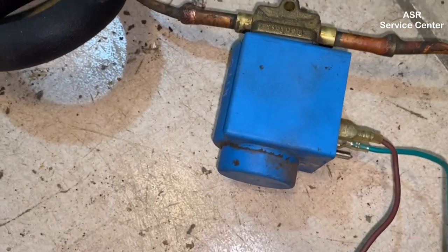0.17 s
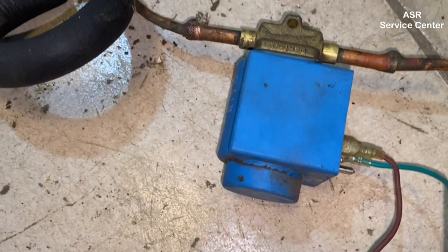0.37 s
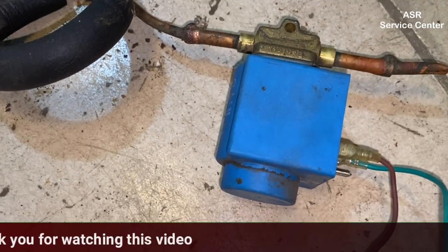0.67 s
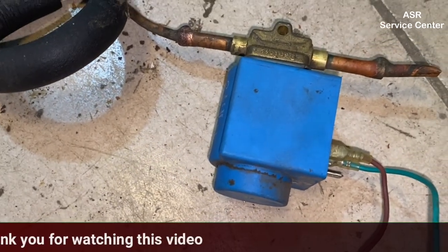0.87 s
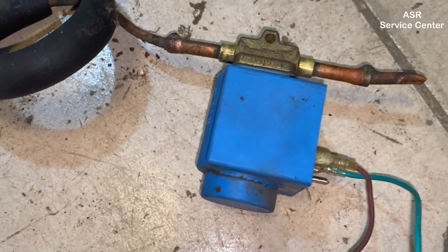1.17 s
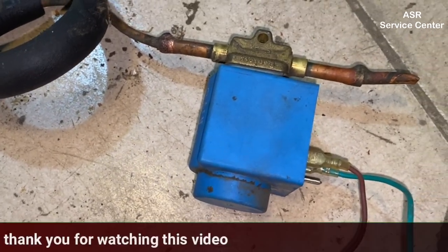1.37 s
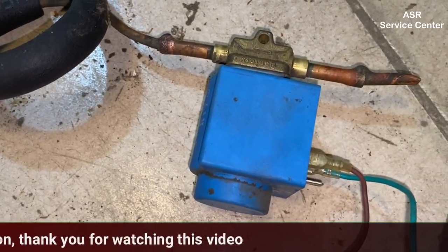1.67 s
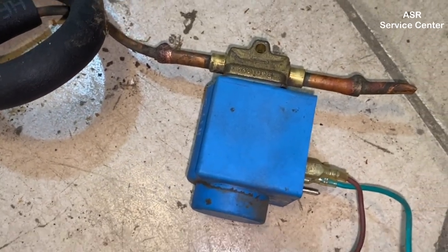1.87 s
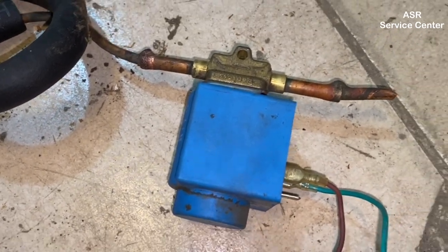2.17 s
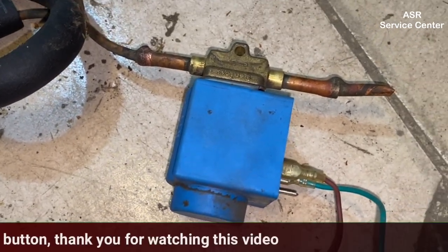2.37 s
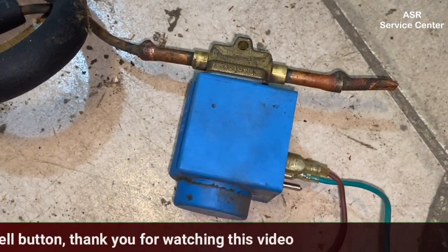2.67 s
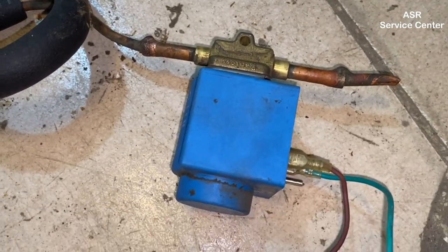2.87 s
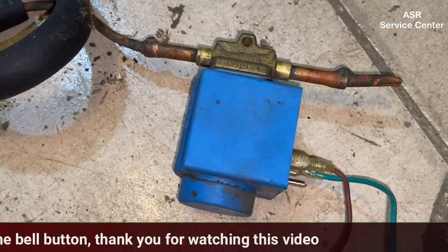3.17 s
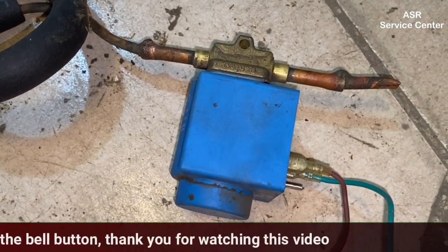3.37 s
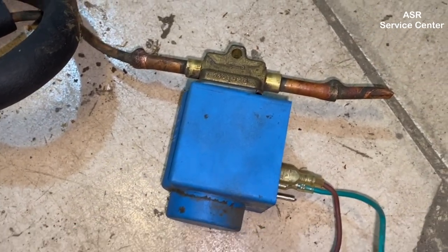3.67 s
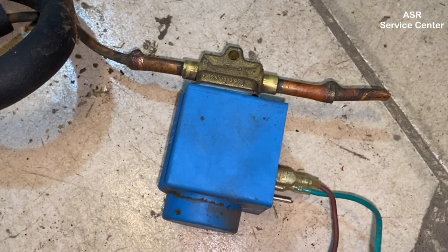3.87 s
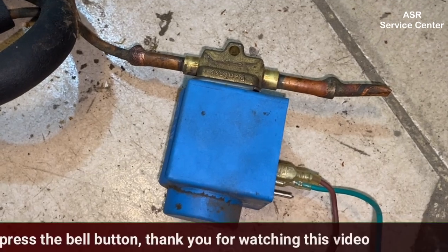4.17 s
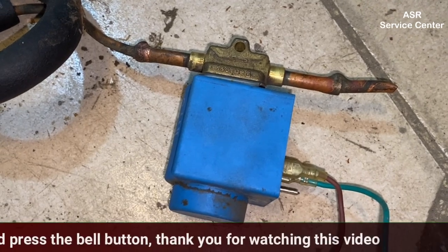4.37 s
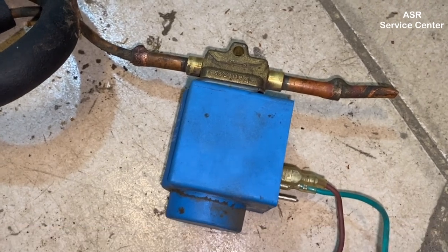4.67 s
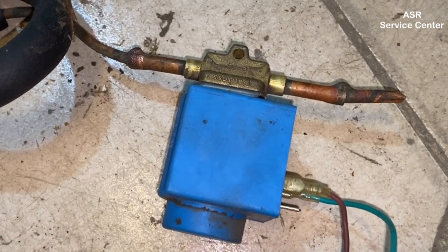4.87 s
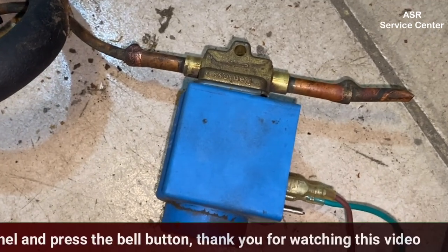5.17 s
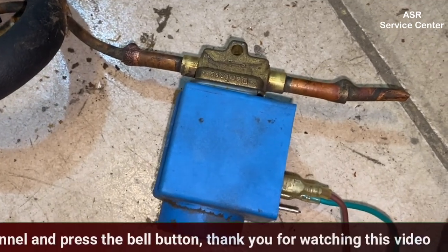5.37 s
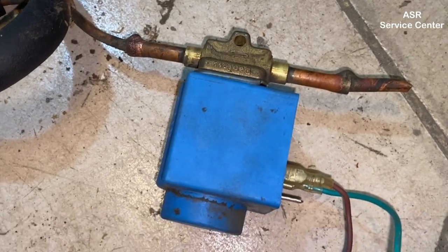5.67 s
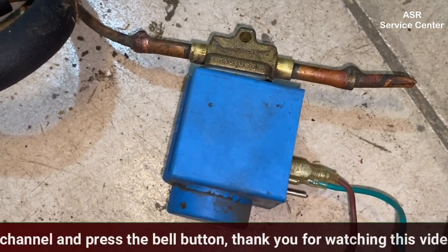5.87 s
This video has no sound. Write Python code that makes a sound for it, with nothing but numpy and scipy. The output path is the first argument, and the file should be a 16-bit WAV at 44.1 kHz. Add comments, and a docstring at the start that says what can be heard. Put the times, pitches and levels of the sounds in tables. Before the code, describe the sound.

Four loud, sharp metallic clacks alternate with softer, rattlier clicks as a solenoid valve switches on and off over a low motor hum.

```python
"""A motor hums and drones over steady air noise; then come faint ticks and four pairs of metallic clacks.
A solenoid valve on a workshop floor is switched on and off four times, close to a phone.
Each pull slams the plunger home: it chatters, rings the brass body and copper pipe, and thuds in the floor.
Each release lets a spring throw it back more softly, with a scrape, a rattle and a few fading pings.
Tones make the hum and the body's ring, shaped noise the rest; the phone ducks after loud clicks."""
import sys
import numpy as np
from scipy import signal
from scipy.fft import rfft, irfft
from scipy.io import wavfile
from scipy.ndimage import uniform_filter1d

SR = 44100
rng = np.random.default_rng(int(sys.argv[2]) if len(sys.argv) > 2 else 0)


def materialize(psi):
    """Save the field psi as 16-bit PCM at rate SR to the path in sys.argv[1].

    A 1-D psi becomes a single channel; in a 2-D psi each row is a channel.
    """
    bounded = np.clip(np.atleast_2d(psi).T, -1, 1)
    quanta = np.round(bounded * 32767).astype(np.int16)
    wavfile.write(sys.argv[1], SR, quanta)


N = 265041

# Steady noise of the workshop air: pitch_hz, relative_level_per_hz_db, side_minus_mid_db
AIR = [(25.1, -25, -17), (60, 0, -14), (101.6, -1.5, -15.5), (172, -5, -15), (244, -1.5, -11),
       (364.6, -3.5, -9), (466, -10.5, 0.5), (700, -7.5, 1.5), (1000, -9, -1.5), (1375, -12, 3.5),
       (2300, -20, -3.5), (3086, -23, -3.5), (3945, -27.5, -3), (6600, -35.5, -3.5), (9100, -44, 9),
       (11570, -44, -7), (16100, -73, 5.5)]
# Resonances in the motor's drone: pitch_hz, width_hz, rms_level_db, left_minus_right_db
DRONE = [(145.6, 5.4, -56.5, -4.5), (251.5, 12, -54, -3), (558.3, 14, -57, 1.5), (637, 60, -49.5, 4),
         (865, 16, -62, 0.5), (1078, 22, -61, 2.5), (1830, 160, -63, 5), (2400, 110, -66, 7)]
# The motor's tones: multiple_of_shaft_rate, rms_level_db, level_waver_db, phase_wander_radians,
# left_minus_right_db, left_lead_radians
HUM = [(1, -45, 1.25, 0.13, -1.5, 0.018), (13, -48.5, 2, 0.85, 5, 1.704)]
# Stray ticks; the second to fifth come as the plunger drags just before its first pull: start_s, level_db,
# pitch_hz, width_hz, t60_s (t60 is the time to fade by 60 dB)
TICKS = [(.288, -46, 3100, 1900, 0.12), (0.3253, -39, 2900, 350, 0.047), (0.3272, -34, 1200, 350, 0.045),
         (.3262, -36.5, 3000, 3020, .07), (0.332, -37.5, 6370, 1500, 0.14),
         (1.384, -48.5, 6000, 5530, 0.038), (1.680, -56.5, 8150, 7000, .04)]
# Coil on, plunger slams home: start_s, level_db, first_rebound_ms, rebound_db, knock_db, top_treble_db,
# favoured_pitch_hz, favoured_boost_db, ping_db, long_ring_db
PULLS = [(0.3407, -2, 2.2, 0, 3, -0.5, 3050, 2.5, 1, 2.5),
         (2.1495, -2, 2.7, 0, 3.5, 0.5, 1460, 3.5, 0.5, 3.5),
         (3.4495, -1, 1.6, 0.5, 3, -1, 7000, 6.5, 0.5, 2.5),
         (5.049, -1.5, 3, 0, 5.5, 4, 2740, 4, -4.5, 3.5)]
# Coil off, plunger falls back: start_s, level_db, unstick_level_db, scrape_level_db, favoured_pitch_hz,
# favoured_boost_db, favoured_width_octaves, knock_db, rattle_time_s
RELEASES = [(1.0521, -1, -46, -33, 3150, 13, 0.28, 0.5, .045),
            (2.6389, 0.5, -28, -36, 3160, 3.5, 0.13, -0.5, .045),
            (4.0885, 1, -44, -25, 7600, 3, 0.15, 0.5, .045),
            (5.6002, -0.5, -24, -29, 4120, 6.5, .2, -0.5, .03)]
# The crack of steel on steel: pitch_hz, pull_level_db, release_level_db
CRACK = [(100, -5.5, -6), (395, -1, -1.5), (1020, -1.5, 2), (2940, 5.5, 1), (5350, 2.5, -3.5),
         (7000, 9.5, -0.5), (8260, -2.5, 7.5), (9880, 4, -1.5), (11600, 1, 6), (11470, 7, -17.5),
         (12770, 0, -4), (15650, -9.5, -10.5)]
# Ringing modes of the valve body: pitch_hz, t60_s, pull_level_db, release_level_db
BODY = [(306, 0.13, -43.5, -60), (457, .03, -41, -54.5), (677, .025, -38, -54), (825, .03, -33.5, -47),
        (1055, 0.023, -33, -38), (1520, 0.03, -28, -36), (1767, 0.028, -31, -26), (2025, .03, -43, -33),
        (2240, 0.034, -29, -38), (2530, 0.034, -45.5, -31), (2707, .035, -35.5, -58),
        (2876, 0.03, -36, -72), (3166, .025, -35, -38), (3530, .035, -34.5, -44), (4260, 0.03, -34, -32),
        (4760, 0.022, -40, -50), (5950, .02, -28, -55), (6587, 0.039, -19.5, -46), (7420, .026, -23.5, -35),
        (7860, .026, -8.5, -32), (8200, .018, -24, -36), (8440, .022, -25, -27), (8630, .028, -33, -25),
        (8900, .025, -26, -31), (9760, .024, -27, -33), (12030, .026, -26.5, -48), (12630, .02, -28.5, -39),
        (13290, 0.02, -29.5, -42), (13200, .02, -35.5, -39), (14730, .02, -35, -50)]
# Clusters of close modes in the copper pipe: pitch_hz, width_hz, t60_s, pull_level_db, release_level_db
PIPE = [(1900, 900, .3, -47, -70), (4330, 120, .45, -54, -76), (4700, 1600, .38, -44.5, -60),
        (6050, 900, .56, -43, -63), (6500, 60, .45, -47, -72), (7260, 130, .55, -46, -72),
        (7865, 85, .42, -42, -68), (8350, 700, .36, -45, -55), (8000, 3000, .48, -44, -62),
        (12300, 1600, .3, -51, -58)]
# The plunger rattling on its return spring: pitch_hz, t60_s, level_db
SPRING = [(1780, 0.01, -36), (1990, 0.012, -31.5), (2470, 0.0064, -42), (8400, .012, -49)]
# Taps of the plunger on its spring after a release: delay_s, level_db
BOBS = [(.0108, -0.5), (.0198, -6.5), (.0245, -1.5), (.034, -16), (.0378, 0.5)]
# The two microphone ports: pitch_hz, left_minus_right_db, left_lead_radians
PORTS = [(300, -1, 0), (750, 4, .9), (1000, 4, 1.8), (1350, 1.5, 1.8), (2000, 4.5, .9), (3000, 5.5, .7),
         (4300, 6, .7), (5400, 6, -.2), (6500, 2, .1), (7800, .5, -1.5), (8900, 0, -3.1), (13200, 0, -9.3),
         (15500, 0, -12.8)]

TIME = np.arange(N) / SR
FREQ = np.maximum(np.arange(N // 2 + 1) * SR / N, 1)
AGE = TIME[:SR * 2 // 3]  # seconds since a blow

SHAFT_HZ, AIR_DB = 48.02, -41
ROOM_RIPPLE_DB, ROOM_RIPPLE_HZ = 2, 44.1  # depth and spacing of the room's standing waves
# A faint short burst of noise leads each slam by about two milliseconds
LEAD_IN_S, LEAD_IN_DB, LEAD_IN_HZ, LEAD_IN_WIDTH_HZ, LEAD_IN_T60_S = 0.0023, -37, 4200, 3400, 0.0193
# Every pull knocks on the coil housing; the knock and the treble differ in strength from pull to pull
KNOCK_HZ, KNOCK_OCTAVES, TREBLE_HZ, TREBLE_OCTAVES = 1800, 0.79, 12240, 0.48
PING_HZ, PING_OCTAVES = 7860, .04  # the valve's loudest mode, struck harder or softer at each pull
PULL_CRACK_DB, PULL_CRACK_T60_S, PULL_BODY_DB = -10, 0.016, 2
PIPE_FLICKER_DB, PIPE_FLICKER_HZ = 1.5, 70  # depth and speed of the beating among the pipe's modes
# Every pull thuds into the floor, whose bending waves bring the lows late; the lag holds at the centre pitch
THUD_DB, THUD_HZ, THUD_WIDTH_HZ, THUD_LAG_S = -21, 310, 430, .009
# The loose coil housing rattles after every pull
RATTLE_DB, RATTLE_HZ, RATTLE_WIDTH_HZ = -28, 2505, 2800
RATTLE_GAP_S, RATTLE_T60_S, RATTLE_TAP_T60_S = 0.005, 0.11, 0.0093
# Every release: the plunger unsticks, scrapes along its tube, lands, rebounds and touches its seat again
UNSTICK_LEAD_S, UNSTICK_HZ, UNSTICK_T60_S, UNSTICK_GRIT_DB = 0.0057, 3280, 0.015, -16
SCRAPE_LEAD_S, SCRAPE_HZ, SCRAPE_WIDTH_HZ, SCRAPE_T60_S = 0.0043, 7100, 4500, 0.011
DROP_GAP_MS, DROP_REBOUND_DB = 2.2, -8.5
DROP_CRACK_DB, DROP_CRACK_T60_S, DROP_BODY_DB = -12, 0.0059, -3
DROP_RING_SHARE = 0.79  # the soft seat damps the body: its ring time as a share of that after a pull
SEAT_DELAY_S, SEAT_DB, SEAT_HZ, SEAT_WIDTH_HZ, SEAT_T60_S = .0072, -36, 8000, 2400, 0.021
SURGE_ROUND_TRIP_S = .0125  # time that the wave takes to run up the spring and back
SURGE_HZ, SURGE_WIDTH_HZ, SURGE_T60_S, SURGE_DB, SURGE_LOSS_DB = 6530, 1000, 0.012, -37, -4.5
TOP_HZ = 15600  # the phone passes nothing much above this


def undb(db):
    """Turn decibels into gain."""
    return 10 ** (np.asarray(db) / 20)


def unit(x):
    """Scale to an average (rms) level of 1."""
    return x / np.sqrt(np.mean(x ** 2))


def curve(hz, values):
    """Join points by straight lines on a log-frequency axis."""
    return np.interp(np.log(FREQ), np.log(hz), values)


def noise(gain):
    """Noise of rms 1 with the given gain at each frequency."""
    return unit(irfft(rfft(rng.standard_normal(N)) * gain, N))


def band(hz, width):
    """Gain of a resonance with steep skirts: strongest at one pitch, weaker on both sides."""
    return 1 / (1 + ((FREQ / hz - hz / FREQ) * hz / (1.5 * width)) ** 2)


def wander(hz):
    """Slow random drift of rms 1."""
    return noise(np.exp(-(FREQ / hz) ** 2))


def standing_waves():
    """Gain at each frequency: the room favours some pitches and swallows others."""
    hz = np.arange(0, SR / 2, ROOM_RIPPLE_HZ)
    depth_db = ROOM_RIPPLE_DB * np.minimum(FREQ / 1000, 1)  # full depth from 1 kHz up
    return undb(depth_db * np.interp(FREQ, hz, rng.standard_normal(len(hz))))


def workshop(waver_hz=5, drone_side_db=-9):
    """A motor hums on multiples of its shaft rate and drones in a few resonances over steady air noise."""
    hz, air_db, side_db = np.transpose(AIR)
    side = undb(curve(hz, side_db))
    colour = undb(curve(hz, air_db)) * standing_waves() / np.hypot(1, side)
    mid_noise, side_noise = rfft(rng.standard_normal((2, N)))
    opposed = np.array([[1], [-1]])  # left, right
    air = irfft(colour * (mid_noise + opposed * side * side_noise), N)
    out = undb(AIR_DB) * unit(air)
    for centre, width, db, pan_db in DRONE:
        shape = band(centre, width)
        spread = undb(drone_side_db) * np.interp(centre, FREQ, side)
        drone = noise(shape) + opposed * spread * noise(shape)
        out += undb(db + opposed * pan_db / 2) * unit(drone)
    for multiple, db, waver_db, drift, pan_db, lead in HUM:
        steady_phase = 2 * np.pi * round(multiple) * SHAFT_HZ * TIME
        tone = np.sin(steady_phase + drift * wander(waver_hz) + opposed * lead / 2)
        wavering = tone * undb(waver_db * wander(waver_hz))
        out += undb(db + opposed * pan_db / 2) * unit(wavering)
    return out


def burst(gain):
    """A stretch of coloured noise, rms 1, long enough for one blow."""
    size = len(AGE)
    colour = np.interp(np.arange(size // 2 + 1) * SR / size, FREQ, gain)
    return unit(irfft(rfft(rng.standard_normal(size)) * colour, size))


def fade(t60, delay=0, rise=0.0001):
    """Loudness shape of one blow: a quick rise, then an exponential decay."""
    age = np.maximum(AGE - delay, 0)
    return np.minimum(age / rise, 1) * np.exp(-np.log(1000) * age / t60)


def add(track, s, sound):
    """Mix a sound into the track from time s."""
    start = int(s * SR)
    track[start:start + len(sound)] += sound[:N - start]


def tick(db, hz, width, t60):
    """A faint tick: a short burst of noise in one resonance."""
    return undb(db) * burst(band(hz, width) ** 2) * fade(t60, rise=0.00048)


def stray_ticks():
    """Faint touches of metal: a stray tick, the plunger dragging just before its first pull, and two more ticks
    later."""
    track = np.zeros(N)
    for s, db, hz, width, t60 in TICKS:
        add(track, s, tick(db, hz, width, t60))
    return track


def favour(hz, db, octaves=0.088):
    """The plunger never seats quite alike: each landing lifts or cuts some part of the spectrum."""
    return undb(db * np.exp(-(np.log2(FREQ / hz) / octaves) ** 2))


def ring(hz, detune=0.002):
    """One ringing mode as a sine, a little differently tuned at each blow."""
    tuned_hz = hz * (1 + detune * rng.standard_normal())
    return np.sin(2 * np.pi * (tuned_hz * AGE + rng.random()))


def chatter(t60, gap_ms, rebound_db, shrink=.65, loss_db=-2.5):
    """The plunger lands and rebounds three times, each rebound weaker; the energies of the blows add."""
    gap = gap_ms / 1000
    blows = [(0, 0.0049)]  # delay in s, level in dB
    blows += [(gap * (1 + k * shrink), rebound_db + k * loss_db) for k in range(3)]
    return np.sqrt(sum((undb(db) * fade(t60, delay, rise=0.00035)) ** 2 for delay, db in blows))


def stroke(body_db, crack_shape_db, pipe_db, crack_db, crack_t60, gap_ms, rebound_db, landing, ring_share=1):
    """One stroke cracks, rings the valve body briefly and leaves the pipe shimmering."""
    crack_colour = undb(curve([row[0] for row in CRACK], crack_shape_db))
    click = undb(crack_db) * burst(crack_colour * landing) * chatter(crack_t60, gap_ms, rebound_db)
    for (hz, t60, *_), db in zip(BODY, body_db):
        strength = undb(db) * np.interp(hz, FREQ, landing)
        click += strength * ring(hz) * chatter(t60 * ring_share, gap_ms, rebound_db)
    beating = undb(PIPE_FLICKER_DB * burst(np.exp(-(FREQ / PIPE_FLICKER_HZ) ** 2)))
    for (hz, width, t60, *_), db in zip(PIPE, pipe_db):
        strength = undb(db) * np.interp(hz, FREQ, landing)
        click += strength * burst(band(hz, width) * landing) * fade(t60) * beating
    return click


def thud():
    """One smooth, broad push on the floor, spread out so that the lows arrive last."""
    phase = 4 * np.pi * THUD_LAG_S * np.sqrt(THUD_HZ * FREQ)
    wave = irfft(band(THUD_HZ, THUD_WIDTH_HZ) * np.exp(-1j * phase), N)[:len(AGE)]
    return undb(THUD_DB) * wave / np.abs(wave).max()


def housing_rattle(count=10):
    """The loose housing makes a quick, uneven run of small taps that dies away."""
    delays = RATTLE_GAP_S * np.cumsum(.5 + rng.random(count))
    sizes = undb(2 * rng.standard_normal(count)) * np.exp(-np.log(1000) * delays / RATTLE_T60_S)
    energy = sum((size * fade(RATTLE_TAP_T60_S, delay)) ** 2 for delay, size in zip(delays, sizes))
    return undb(RATTLE_DB) * burst(band(RATTLE_HZ, RATTLE_WIDTH_HZ)) * np.sqrt(energy)


def pull_in():
    """The coil draws the plunger up its tube and slams it home; the floor thuds and the housing rattles."""
    track = np.zeros(N)
    body_db, pipe_db, crack_shape_db = np.transpose(BODY)[2], np.transpose(PIPE)[3], np.transpose(CRACK)[1]
    for s, db, gap_ms, rebound_db, knock_db, treble_db, spot_hz, spot_db, ping_db, ring_db in PULLS:
        landing = favour(KNOCK_HZ, knock_db, KNOCK_OCTAVES) * favour(TREBLE_HZ, treble_db, TREBLE_OCTAVES)
        landing = landing * favour(spot_hz, spot_db) * favour(PING_HZ, ping_db, PING_OCTAVES)
        add(track, s - LEAD_IN_S, tick(LEAD_IN_DB, LEAD_IN_HZ, LEAD_IN_WIDTH_HZ, LEAD_IN_T60_S))
        slam = stroke(body_db + PULL_BODY_DB, crack_shape_db, pipe_db + ring_db,
                      PULL_CRACK_DB, PULL_CRACK_T60_S, gap_ms, rebound_db, landing)
        add(track, s, undb(db) * (slam + thud() + housing_rattle()))
    return track


def drop_out():
    """The plunger unsticks, scrapes back along its tube, lands softly and touches its seat once more."""
    track = np.zeros(N)
    body_db, pipe_db, crack_shape_db = np.transpose(BODY)[3], np.transpose(PIPE)[4], np.transpose(CRACK)[2]
    for s, db, unstick_db, scrape_db, spot_hz, spot_db, spot_octaves, knock_db, _ in RELEASES:
        landing = favour(KNOCK_HZ, knock_db, KNOCK_OCTAVES) * favour(spot_hz, spot_db, spot_octaves)
        grit = undb(UNSTICK_GRIT_DB) * burst(band(SCRAPE_HZ, SCRAPE_WIDTH_HZ))
        unstick = (ring(UNSTICK_HZ, detune=0.032) + grit) * fade(UNSTICK_T60_S, rise=0.000488)
        add(track, s - UNSTICK_LEAD_S, undb(unstick_db) * unstick)
        add(track, s - SCRAPE_LEAD_S, tick(scrape_db, SCRAPE_HZ, SCRAPE_WIDTH_HZ, SCRAPE_T60_S))
        soft_blow = stroke(body_db + DROP_BODY_DB, crack_shape_db, pipe_db, DROP_CRACK_DB, DROP_CRACK_T60_S,
                           DROP_GAP_MS, DROP_REBOUND_DB, landing, DROP_RING_SHARE)
        add(track, s, undb(db) * soft_blow)
        add(track, s + SEAT_DELAY_S, tick(db + SEAT_DB, SEAT_HZ, SEAT_WIDTH_HZ, SEAT_T60_S))
    return track


def spring_rattle(scatter_db=1.5):
    """After each release the plunger bobs on its spring and taps a few more times, until it comes to rest."""
    track = np.zeros(N)
    for s, *_, rattle_s in RELEASES:
        for delay, bob_db in BOBS:
            if delay >= rattle_s:
                continue
            tap = np.zeros(len(AGE))
            for hz, t60, db in SPRING:
                strength = undb(db + scatter_db * rng.standard_normal())
                tap += strength * ring(hz, detune=0.028) * fade(t60, rise=0.00076)
            add(track, s + delay, undb(bob_db) * tap)
    return track


def spring_surge(count=4, scatter_db=2.5):
    """A wave runs up and down the spring after each release: evenly spaced pings that tend to fade."""
    track = np.zeros(N)
    for s, *_ in RELEASES:
        for k in range(count):
            db = SURGE_DB + k * SURGE_LOSS_DB + scatter_db * rng.standard_normal()
            ping = tick(db, SURGE_HZ, SURGE_WIDTH_HZ, SURGE_T60_S)
            add(track, s + (k + 1) * SURGE_ROUND_TRIP_S, ping)
    return track


def valve():
    """A few stray ticks, hard strokes in, and soft strokes out with their rattle and pings."""
    return stray_ticks() + pull_in() + drop_out() + spring_rattle() + spring_surge()


def ports(x):
    """The near valve reaches the two microphone ports with different level and delay."""
    hz, pan_db, lead = np.transpose(PORTS)
    half = undb(curve(hz, pan_db) / 2) * np.exp(.5j * np.interp(FREQ, hz, lead))
    return irfft(rfft(x) * np.array([half, 1 / half]), N)


def echoes(x, db, t60, delay, dull_hz):
    """Dense reflections, different at each port and duller than the direct sound."""
    out = []
    for _ in range(2):
        response = burst(1 / np.hypot(1, FREQ / dull_hz)) * fade(t60, delay, rise=0.0039)
        out.append(signal.fftconvolve(x, response / np.linalg.norm(response))[:N])
    return undb(db) * np.array(out)


def scene():
    """The background, the valve, its scatter from nearby things, the walls and the far room."""
    background = workshop()
    clicks = valve()
    near = echoes(clicks, db=-10.5, t60=.09, delay=.003, dull_hz=7000)
    walls = echoes(clicks, db=-20.0, t60=0.12, delay=0.0064, dull_hz=2490)
    far = echoes(clicks, db=-23.5, t60=.42, delay=.016, dull_hz=3000)
    return ports(clicks) + near + walls + far + background


def gain_control(x, threshold_db, slope, release_db_per_s, attack=.004, window=.002):
    """Turn down within a few milliseconds when the level passes the threshold, then recover steadily."""
    power = uniform_filter1d(np.mean(x ** 2, axis=0), max(int(window * SR), 1))
    over_db = np.maximum(10 * np.log10(np.maximum(power, 1e-12)) - threshold_db, 0)
    recovery = release_db_per_s * TIME
    held_db = np.maximum.accumulate(over_db + recovery) - recovery  # jumps up, slides down
    pole = np.exp(-1 / (attack * SR))
    smooth_db = signal.lfilter([1 - pole], [1, -pole], held_db)
    return x * undb(-slope * smooth_db)


def record(dry):
    """The phone ducks after loud clicks, rounds their peaks and cuts the top."""
    ducked = gain_control(dry, threshold_db=-23, slope=.35, release_db_per_s=62)
    rounded = np.tanh(ducked)
    top_cut = signal.ellip(8, .1, 60, TOP_HZ, fs=SR, output="sos")
    return signal.sosfiltfilt(top_cut, rounded)


dry = scene()
out = record(dry)
materialize(out)
```